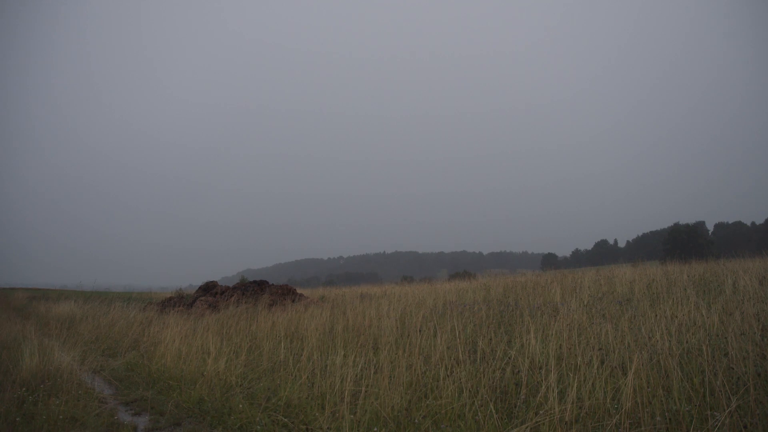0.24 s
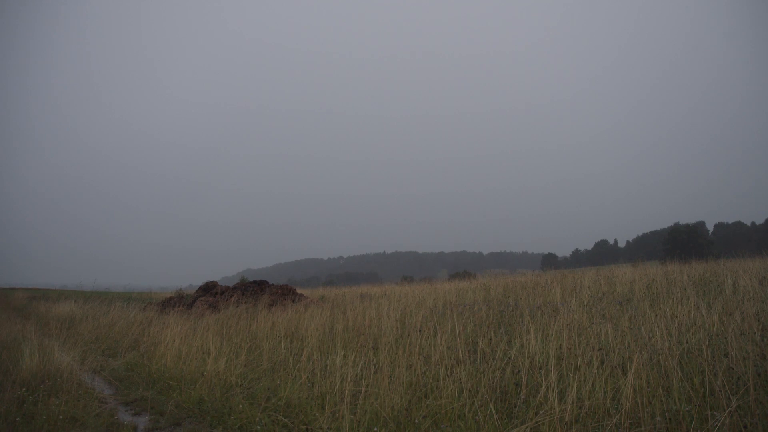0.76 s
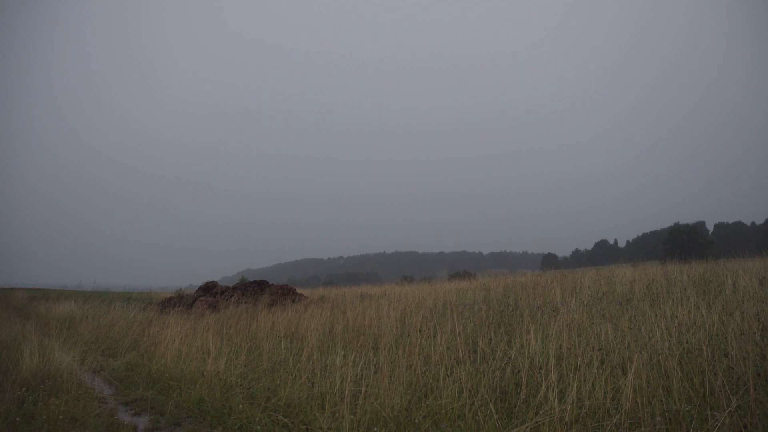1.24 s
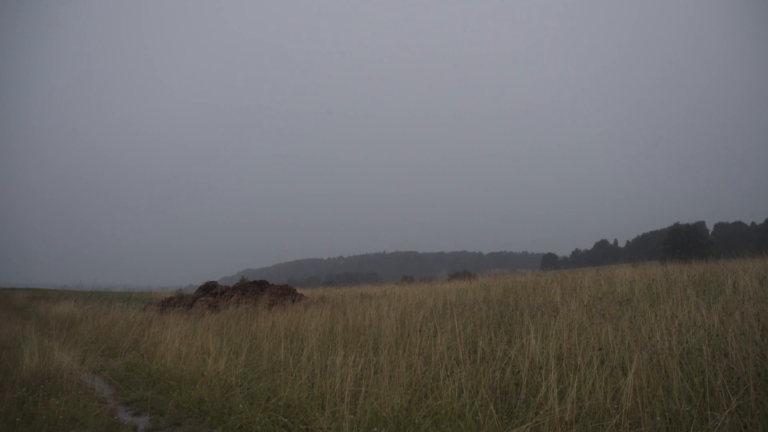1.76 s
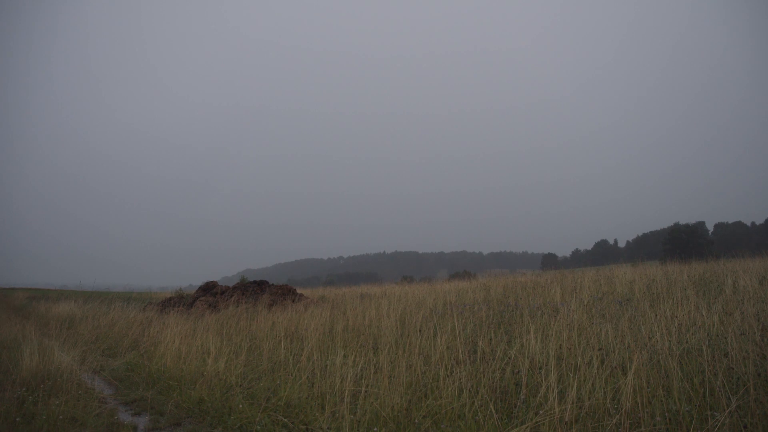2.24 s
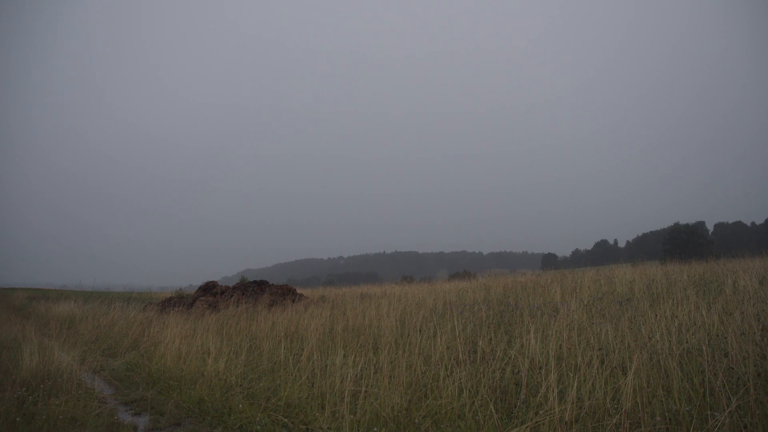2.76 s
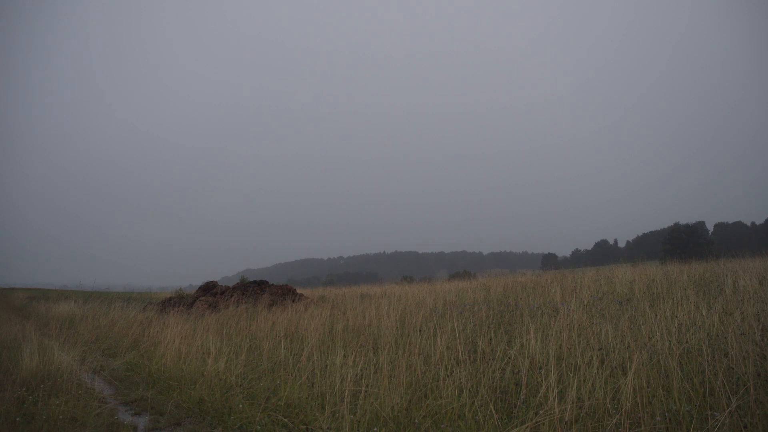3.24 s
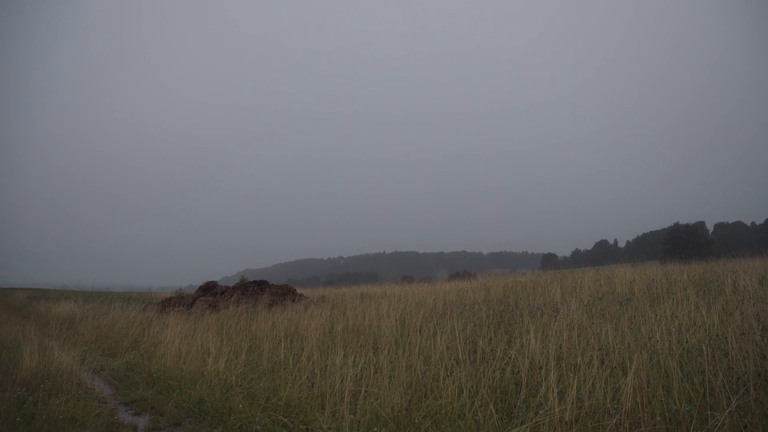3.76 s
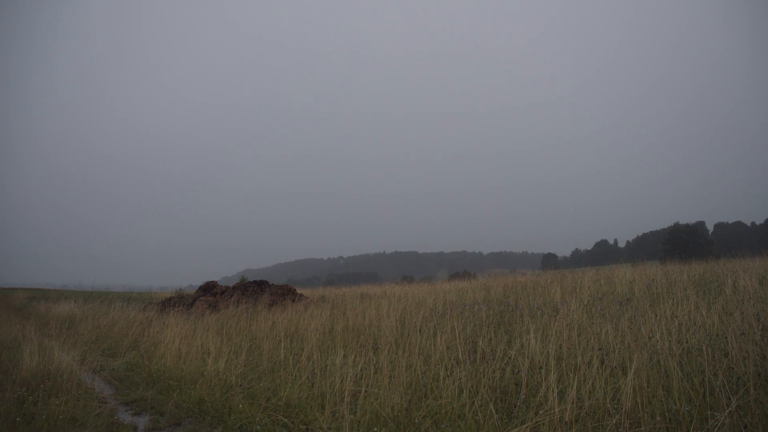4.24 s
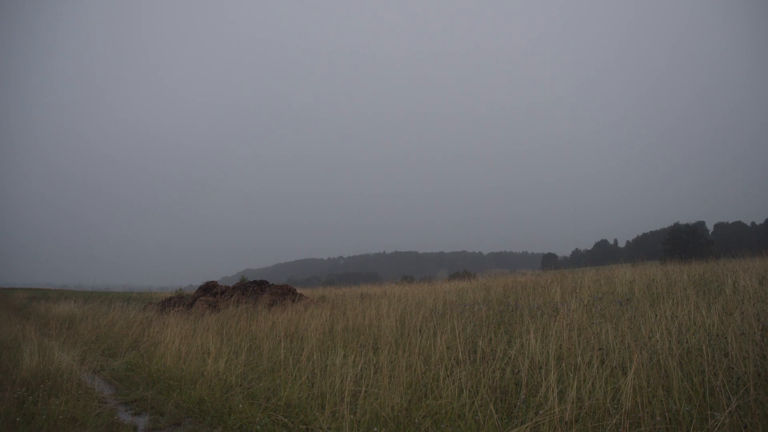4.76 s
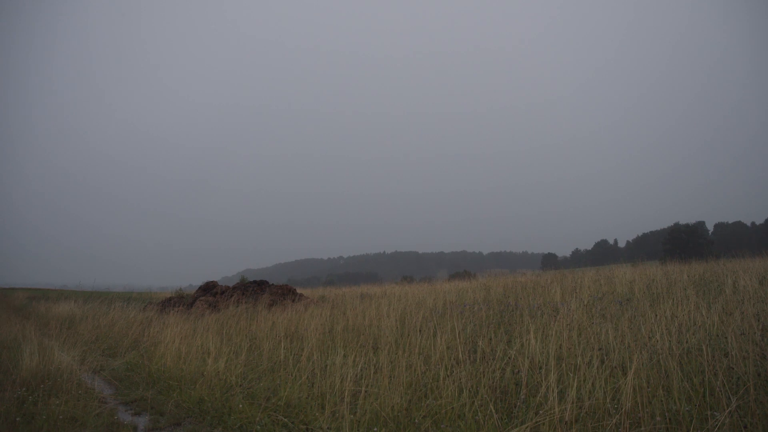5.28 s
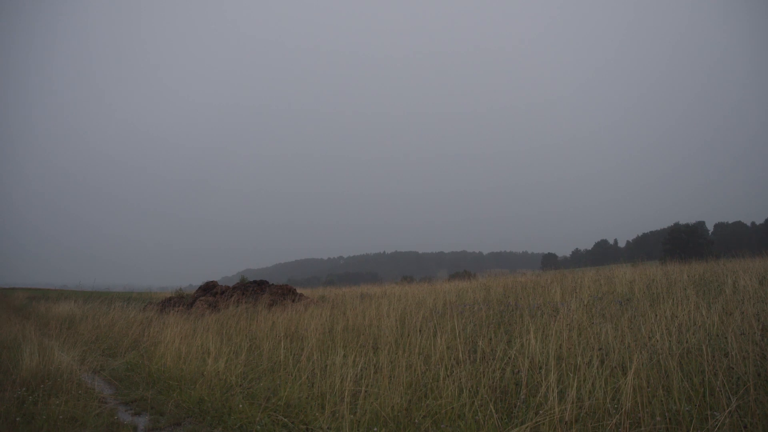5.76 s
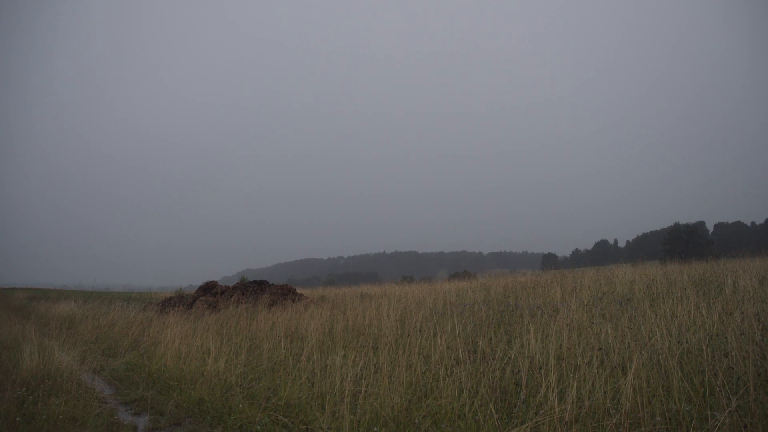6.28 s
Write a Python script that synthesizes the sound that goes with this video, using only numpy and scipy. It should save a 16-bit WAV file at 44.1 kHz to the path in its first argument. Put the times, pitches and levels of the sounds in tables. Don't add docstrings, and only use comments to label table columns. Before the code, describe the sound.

In an open wet field, thunder is already rolling as it starts, knocks harder, then breaks into a cluster of heavy claps at about one second. A second, weaker group follows near two to three seconds, then a duller bumpy rumble fades. Light rain hisses on grass throughout, and single drops click on the small outdoor stereo microphone.

```python
import sys
import numpy as np
from scipy import signal
from scipy.fft import rfft, irfft
from scipy.io import wavfile
from scipy.ndimage import uniform_filter1d

SR = 44100
rng = np.random.default_rng(int(sys.argv[2]) if len(sys.argv) > 2 else 0)


def unload_wav(signal):
    wavfile.write(
        sys.argv[1],
        SR,
        np.round(np.clip(np.atleast_2d(signal).T, -1, 1) * 32767).astype(np.int16),
    )


def decibels_to_gain(level_db):
    exponent = np.asarray(level_db, float) / 20
    return 10 ** exponent


N = 287532


def evened(x):
    return x / np.sqrt(np.mean(x ** 2) + 1e-20)


def read(points, hz):
    f, value = np.transpose(points)
    return np.interp(np.log(hz + 1), np.log(f + 1), value)


def shaped(x, gain):
    size = x.shape[-1]
    return irfft(rfft(x) * gain(np.fft.rfftfreq(size, 1 / SR)), size)


def add(mix, s, sound):
    at = round(s * SR) - sound.shape[-1] // 2
    a, b = max(at, 0), min(at + sound.shape[-1], N)
    mix[..., a:b] += sound[..., a - at:b - at]


def sides(db):
    left = 1 / (1 + decibels_to_gain(-2 * db))
    return np.sqrt([[left], [1 - left]])


# frequency_hz, level_db
THUNDER_SPECTRUM = [(12, -30), (22, -18.5), (170, 2.5), (400, 3.5), (560, -2), (680, -1), (1000, -10),
                    (1400, -17.5), (1800, -27.5), (2300, -41.5), (3000, -46)]


def air(hz):
    octaves_above = np.log2((hz + 1) / THUNDER_SPECTRUM[-1][0])
    return decibels_to_gain(read(THUNDER_SPECTRUM, hz) - 40 * np.maximum(octaves_above, 0))


# start_s, level_db, tilt_db_per_octave
ROLL = [(0.0, -42, 1), (0.38, -41, 2.5), (0.74, -42, 2), (1.09, -44.5, 0), (1.32, -43, 0),
        (1.61, -47.5, -0.5), (1.83, -49.5, -3), (2.0, -42, -1.5), (2.29, -48.5, 3), (2.45, -40.5, -1),
        (2.59, -39, -2.5), (3.56, -37, -1), (3.69, -38.5, -1), (4.1, -39.5, 0), (4.25, -37, 0),
        (5.1, -44.5, -0.5), (6.25, -46, -1.5), (6.52, -40, -1.5)]
BAND_HZ = (60, 230, 780, 1250)
BAND_DB = (-10.5, -10.5, -7.5, -15.5)
DULLING_DB_PER_S = (0, 0, 0, -1.5)
WAKE_DB, WAKE_S = (-13.5, -24.5, -13.5, -23), 0.026


def rumble(per_s=4000, spread_db=2.0, lumps_db=1.1):
    size = decibels_to_gain(spread_db * np.minimum(rng.exponential(1, N), 4))
    shocks = size * rng.standard_normal(N) * (rng.random(N) < per_s / SR)
    lumps = uniform_filter1d(rng.standard_normal(N), size=900)
    lumps = evened(uniform_filter1d(lumps, size=900))
    shocks = shaped(shocks * decibels_to_gain(lumps_db * lumps), air)

    t = np.arange(0, N, 100) / SR
    s, level_db, tilt_db = np.transpose(ROLL)
    wake = np.zeros(len(t))
    for at, db, length, _ in TRUNK + BRANCH + CLOUD:
        time_constant = np.where(t > at, WAKE_S, length / 2)
        wake += decibels_to_gain(2 * db) * length / WAKE_S * np.exp(-abs(t - at) / time_constant)

    out = np.zeros(N)
    bands = zip(np.eye(len(BAND_HZ)), BAND_HZ, BAND_DB, WAKE_DB, DULLING_DB_PER_S)
    for share, hz, band_db, wake_db, dull_db in bands:
        band = shaped(shocks, lambda f: read(list(zip(BAND_HZ, share)), f))
        roll_db = band_db + np.interp(t, s, level_db + tilt_db * np.log2(hz / 300))
        power = decibels_to_gain(2 * roll_db) + decibels_to_gain(2 * wake_db) * wake
        envelope = np.sqrt(power) * decibels_to_gain(dull_db * (t - 2))
        out += evened(band) * np.interp(np.arange(N) / SR, t, envelope)
    return out


# frequency_hz, density_db_per_hz
RAIN_SPECTRUM = [(30, 3), (150, -1), (1000, 4), (2300, -11.5), (4000, -16.5), (6500, -20), (10000, -23),
                 (13000, -23), (15500, -29)]
# frequency_hz, likeness (0 to 1)
RAIN_SAME = [(100, 1), (1500, 0.8), (3000, 0.61), (6800, 0.25), (12000, 0.037)]


def rain(level_db=-58.5, per_s=2500, spread_db=3.0, hiss=1.3, swell_db=1.0):
    size = decibels_to_gain(spread_db * np.minimum(rng.exponential(1, (2, N)), 2.5))
    size = size * (rng.random((2, N)) < per_s / SR)
    patter = evened(size * rng.standard_normal((2, N)))
    a, b = patter + hiss * rng.standard_normal((2, N))
    same = lambda hz: np.clip(read(RAIN_SAME, hz), 0, 1)
    pair = np.array([a, shaped(a, same) + shaped(b, lambda hz: np.sqrt(1 - same(hz) ** 2))])
    pair = evened(shaped(pair, lambda hz: decibels_to_gain(read(RAIN_SPECTRUM, hz))))
    return decibels_to_gain(level_db + swell_db * np.linspace(-1, 1, N)) * pair


def wind(level_db=-67, top_hz=60):
    flutter = shaped(rng.standard_normal((2, N)), lambda hz: (hz > 22) / (1 + (hz / top_hz) ** 2))
    return decibels_to_gain(level_db) * evened(flutter)


# centre_s, rms_db, length_s, pitch_hz
TRUNK = [(0.02, -41, 0.023, 392), (0.083, -37, 0.0066, 408), (0.132, -36.5, 0.017, 244.7),
         (0.251, -32, 0.037, 392.7), (0.297, -25.5, 0.018, 692), (0.344, -34.5, 0.032, 599),
         (0.391, -39.5, 0.067, 353.4), (0.505, -36.5, 0.011, 193), (0.543, -36, 0.022, 419),
         (0.694, -35.5, 0.013, 423.4), (0.721, -36, 0.034, 170.3), (0.78, -43, 0.039, 433.4),
         (0.802, -31, 0.0079, 234.3), (0.878, -33, 0.013, 206.6), (0.935, -39.5, 0.014, 516),
         (0.965, -26, 0.0067, 295), (0.979, -21.5, 0.018, 274.5), (0.998, -26, 0.0096, 323),
         (1.019, -21, 0.0021, 224), (1.055, -23.5, 0.0057, 172), (1.093, -36.5, 0.022, 371.3),
         (1.141, -31, 0.017, 204), (1.182, -37, 0.014, 180.6), (1.201, -35.5, 0.018, 462.4),
         (1.243, -30, 0.013, 691), (1.391, -32, 0.0093, 191.3), (1.56, -40, 0.021, 159),
         (1.613, -47, 0.047, 482)]
# centre_s, rms_db, length_s, pitch_hz
BRANCH = [(1.828, -39.5, 0.049, 468.4), (1.855, -29.5, 0.0096, 473), (1.874, -31, 0.0071, 238.7),
          (1.894, -37.5, 0.014, 244.4), (1.923, -39.5, 0.036, 518), (1.961, -30.5, 0.0082, 474.6),
          (2.018, -29, 0.0086, 208.6), (2.046, -27.5, 0.0073, 252.4), (2.219, -34.5, 0.029, 302),
          (2.267, -41, 0.0071, 542), (2.43, -39, 0.015, 724), (2.46, -41.5, 0.039, 323.6),
          (2.5, -34.5, 0.02, 601), (2.616, -34.5, 0.027, 305.5), (2.66, -28.5, 0.018, 634.5),
          (2.677, -23.5, 0.0033, 299), (2.739, -35, 0.015, 288.4), (2.769, -31.5, 0.0028, 288),
          (2.943, -34.5, 0.01, 336.3), (2.982, -36, 0.039, 172.7), (3.078, -40.5, 0.059, 713),
          (3.284, -37, 0.014, 336.5), (3.389, -39, 0.02, 331)]
# centre_s, rms_db, length_s, pitch_hz
CLOUD = [(3.576, -30, 0.0074, 400.7), (3.616, -39.5, 0.026, 296.6), (3.69, -39, 0.046, 628.4),
         (3.743, -34, 0.039, 369.7), (3.764, -30, 0.008, 331), (3.79, -33.5, 0.0099, 309),
         (3.85, -33.5, 0.038, 467.3), (3.895, -29.5, 0.0059, 127), (3.947, -39.5, 0.0067, 146),
         (4.081, -36, 0.049, 253.7), (4.163, -38, 0.061, 617), (4.217, -40, 0.055, 308),
         (4.316, -42, 0.022, 342), (4.358, -39, 0.014, 364), (4.406, -39, 0.038, 329),
         (4.503, -41, 0.021, 374.4), (4.551, -39.5, 0.017, 143.7), (4.747, -33, 0.015, 358),
         (4.773, -33.5, 0.0085, 526.5), (4.826, -41, 0.029, 517.4), (4.867, -40, 0.016, 487),
         (5.026, -43, 0.021, 77), (5.286, -40.5, 0.013, 392.4), (5.457, -39, 0.012, 545.4),
         (5.799, -37, 0.0054, 127), (5.922, -41.5, 0.033, 389.5), (6.247, -43.5, 0.034, 208),
         (6.299, -32.5, 0.021, 393.3), (6.326, -35.5, 0.015, 186)]


def claps(edge_hz=750, rough=0.59, wander=0.1835, lag_s=0.00304, near_hz=2600, fading=0.25):
    rows, out = TRUNK + BRANCH + CLOUD, np.zeros(N)
    t = (np.arange(4096) - 2048) / SR
    noises = rng.standard_normal((len(rows), 3, len(t)))
    for (s, db, length, hz), (a, b, c) in zip(rows, noises):
        bell = np.exp(-2 * abs(t / max(length, .004)) ** 1.6)
        drift = evened(uniform_filter1d(a, size=250))
        main = np.sqrt(2) * np.cos(2 * np.pi * np.cumsum(hz * (1 + wander * drift)) / SR)
        side = shaped(b, lambda f: air(f) / (1 + (f / edge_hz) ** 6))
        top_hz = near_hz * np.exp(-fading * s)
        high_pass = lambda f: 1 / (1 + (edge_hz / (f + 1)) ** 6)
        edge = shaped(c, lambda f: air(f) * high_pass(f) / (1 + (f / top_hz) ** 4))
        side, edge = (v * np.linalg.norm(bell) / np.linalg.norm(v * bell) for v in (side, edge))
        body = np.sqrt(1 - rough ** 2) * main + rough * side
        edge_db = -9 - 0.0354 * (db + 35) + 2.5 * np.log2(length / .02)
        add(out, s, decibels_to_gain(db) * bell * body)
        add(out, s + lag_s, decibels_to_gain(db + edge_db) * bell * edge)
    return out


# start_s, rms_db, time_constant_s, centre_hz
FRONTS = [(.963, -26.5, 0.006, 800), (.963, -54.5, 0.015, 2060), (0.097, -43, .015, 1300),
          (0.292, -38, .01, 1100), (0.394, -39, 0.026, 1300), (1.061, -49, .025, 1200),
          (1.151, -41, 0.013, 1200), (1.265, -52.5, 0.04, 1330), (1.82, -51.5, 0.036, 1270),
          (1.955, -52.5, 0.062, 1460), (2.204, -38.5, 0.0092, 800), (2.65, -39.5, 0.0078, 1400),
          (2.674, -48, 0.0047, 1490), (4.394, -42, 0.022, 920), (.687, -38, 0.012, 800),
          (.773, -37.5, 0.011, 800), (1.051, -27.5, .008, 700), (1.139, -31, .006, 800),
          (1.179, -32.5, .008, 750), (1.891, -46, .008, 740), (1.954, -44, 0.0072, 750),
          (2.727, -38, 0.021, 700), (2.933, -48, 0.013, 700), (3.061, -50, 0.0098, 750),
          (3.379, -39, 0.013, 750), (3.606, -38, .01, 754), (4.868, -38.5, 0.0072, 700)]


def fronts(rise_s=.0015, width_octaves=.33):
    out, t = np.zeros(N), (np.arange(8192) - 4096) / SR
    for (s, db, fall_s, hz), noise in zip(FRONTS, rng.standard_normal((len(FRONTS), len(t)))):
        burst = shaped(noise, lambda f: np.exp(-.5 * (np.log2((f + 1) / hz) / width_octaves) ** 2))
        shape = np.clip(t / rise_s, 0, 1) * np.exp(-abs(t) / fall_s)
        level = decibels_to_gain(db) * np.linalg.norm(shape) / np.linalg.norm(shape * burst)
        add(out, s, level * shape * burst)
    return out


# start_s, delay_ms
GROUND = [
    (0, 3.34),
    (.4, 3.23),
    (.6, 4.74),
    (2.75, 3.44),
    (2.9, 6.57),
    (4.2, 5.76),
    (6.52, 5.17),
]


def ground(x, bounce=.36):
    t = np.arange(N) / SR
    late = t - np.interp(t, *np.transpose(GROUND)) / 1000
    return (x + bounce * np.interp(late, t, x)) / np.sqrt(1 + bounce ** 2)


# frequency_hz, level_db
SCATTER = [(30, -24), (60, -22), (150, -20), (300, -21), (700, -18), (1500, -15)]


def thunder(echo_db=-14, t60=0.038):
    direct = claps() + fronts()
    t = np.arange(SR // 2) / SR
    tail = rng.standard_normal(len(t)) * decibels_to_gain(-60 * t / t60) * (t > .008)
    echo = decibels_to_gain(echo_db) * signal.fftconvolve(direct, tail / np.linalg.norm(tail))[:N]
    mid = ground(direct + rumble() + echo)
    smear = rng.standard_normal(2048) * np.hanning(2048)
    unlike = signal.fftconvolve(mid, smear / np.linalg.norm(smear), "same")
    unlike = shaped(unlike, lambda hz: decibels_to_gain(read(SCATTER, hz)))
    return np.array([mid + unlike, mid - unlike])


def drop(ring_db, tick_db, pan_db, noise, ring_hz=13000, width_hz=1800, t60=.004, splash_db=-16, strike=5.0):
    t = (np.arange(noise.shape[-1]) - noise.shape[-1] // 2) / SR
    fade = (t >= 0) * (decibels_to_gain(-60 * abs(t) / t60) + decibels_to_gain(splash_db - 60 * abs(t) / 0.022))
    ring = shaped(noise[:2] * fade, lambda hz: (hz > 9000) / (1 + ((hz - ring_hz) / width_hz) ** 2))
    impact = strike * (t == 0)
    shell = lambda hz: (hz < 9800) / (1 + (1700 / (hz + 1)) ** 4) / (1 + hz / 11000)
    tick = shaped(noise[2] * fade + impact, shell)
    ring = ring / abs(signal.hilbert(ring)).max(-1, keepdims=True) * 4.5
    tick = tick / abs(signal.hilbert(tick)).max() * 1.74
    return decibels_to_gain(ring_db) * sides(pan_db) * ring + decibels_to_gain(tick_db) * sides(pan_db / 2) * tick


# start_s, ring_db, tick_db, left_minus_right_db
DROPS = [(0.1536, -61, -47, 14), (0.694, -53.5, -50.5, 22), (1.083, -56, -48, 17), (1.3923, -60, -53, 10),
         (1.5213, -62, -51, 21), (1.7707, -59, -56, 6), (2.0527, -53.5, -47, 12), (2.4175, -58, -50, 3),
         (2.5944, -58, -52, 18), (2.6298, -59, -58, -3), (2.8149, -58, -53, 16), (2.9462, -58, -46.5, 4),
         (3.2417, -60, -53, 2), (3.5492, -64, -49, 13), (3.9544, -53.5, -44.5, 7), (4.1126, -57.5, -62, 16),
         (4.5414, -55, -46.5, 3), (4.6712, -64, -50.5, 1), (4.71, -61, -56, 16), (4.806, -57, -52, -6),
         (5.1769, -58, -50, 11), (5.265, -57, -46.5, 15), (5.4076, -57, -50, 18), (5.4473, -61, -48, 5),
         (5.6684, -54, -49, 15), (5.8436, -55, -46.5, -4), (5.9541, -55, -60, 8), (5.9632, -51.5, -40.5, 7),
         (6.05, -56.5, -51, 17), (6.317, -62, -52, 13)]


def drops(per_s=60, small_db=-74, lean_db=5, scatter_db=8, spread_db=3.4, growth_db_per_s=.4):
    out = np.zeros((2, N))
    for (s, *levels), noise in zip(DROPS, rng.standard_normal((len(DROPS), 3, 1024))):
        add(out, s, drop(*levels, noise))
    when = np.cumsum(rng.exponential(1, size=600)) / per_s
    size_db = spread_db * np.minimum(rng.exponential(1, size=(600, 2)), 3.5)
    size_db = size_db + growth_db_per_s * (when[:, None] - 4)
    pan_db = lean_db + scatter_db * rng.standard_normal(size=600)
    bursts = rng.standard_normal((600, 3, 1024))
    for k in np.flatnonzero(when < N / SR):
        ring_db, tick_db = small_db + size_db[k, 0], small_db + 9.5 + size_db[k, 1]
        add(out, when[k], drop(ring_db, tick_db, pan_db[k], bursts[k]))
    return out


def scene():
    return thunder() + rain() + wind() + drops()


def low_pass(x):
    return signal.sosfilt(signal.butter(12, 15790, fs=SR, output="sos"), x)


# frequency_hz, left_minus_right_db
LEAN = [(60, 2), (110, 2), (200, 1.5), (380, 0.3), (700, 0.7), (1290, 1.8), (2380, 1), (8120, 1.0)]


def record(dry):
    low_cut = lambda hz: 1 / np.sqrt(1 + (36 / (hz + 1)) ** 4)
    lean = lambda hz: decibels_to_gain(np.outer([.5, -.5], read(LEAN, hz) * (hz < 9000)))
    mix = shaped(dry, lambda hz: lean(hz) * low_cut(hz))
    return low_pass(mix)


dry = scene()
out = record(dry)
unload_wav(out)
```